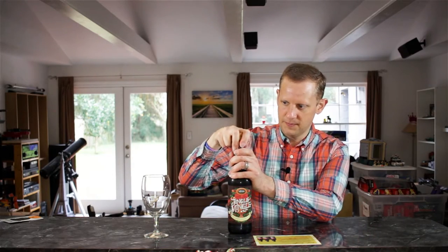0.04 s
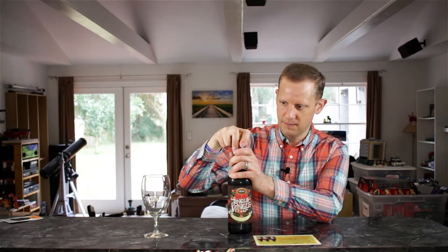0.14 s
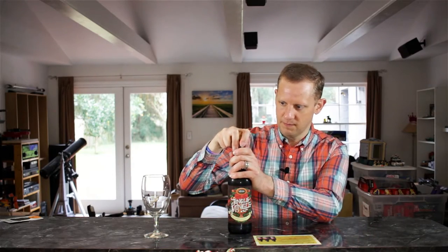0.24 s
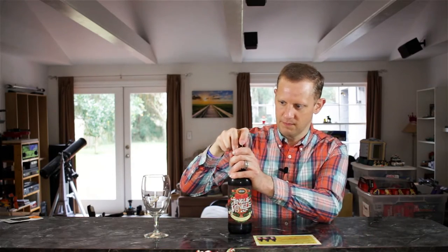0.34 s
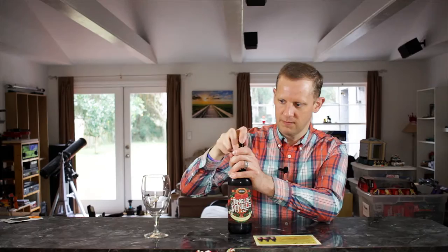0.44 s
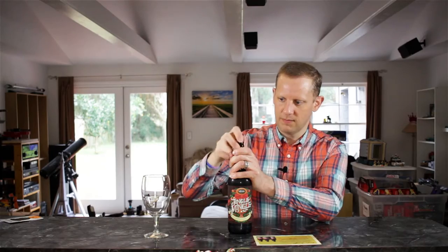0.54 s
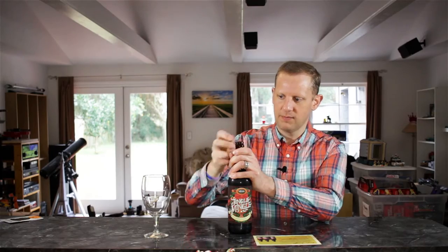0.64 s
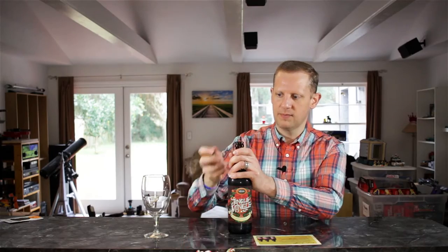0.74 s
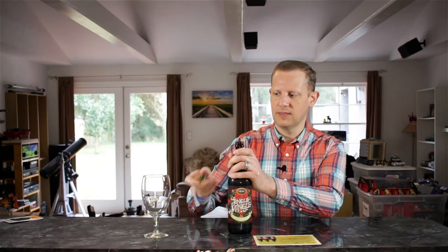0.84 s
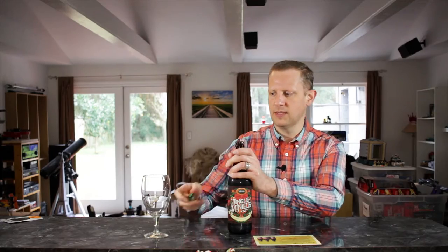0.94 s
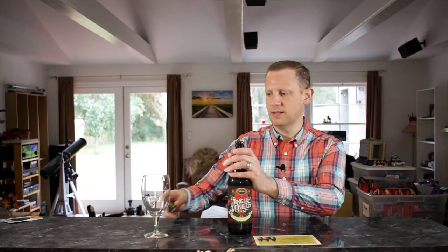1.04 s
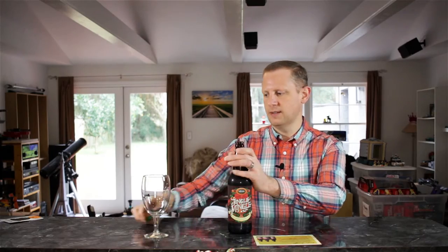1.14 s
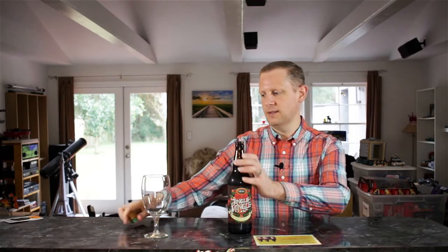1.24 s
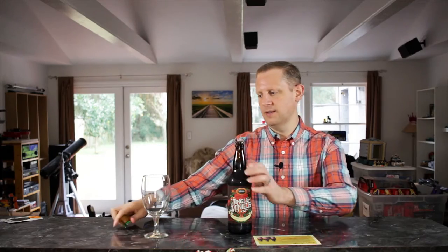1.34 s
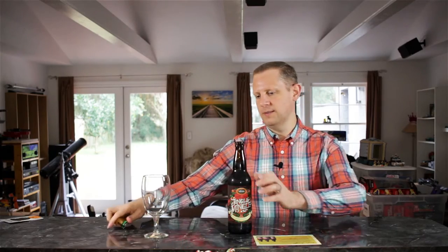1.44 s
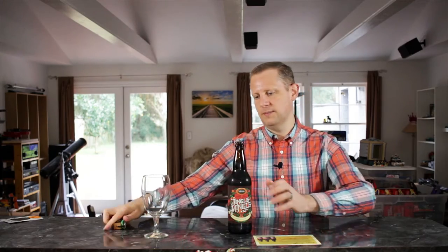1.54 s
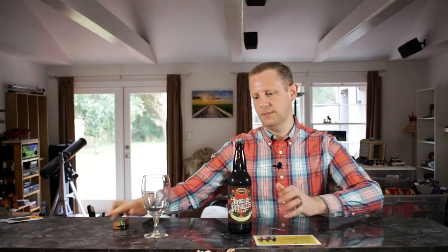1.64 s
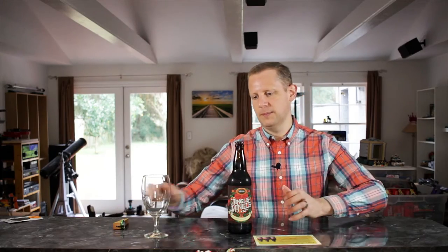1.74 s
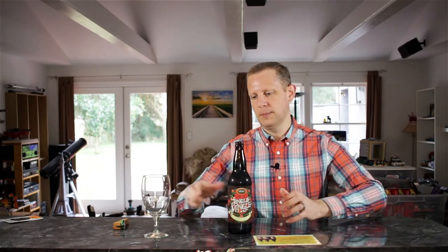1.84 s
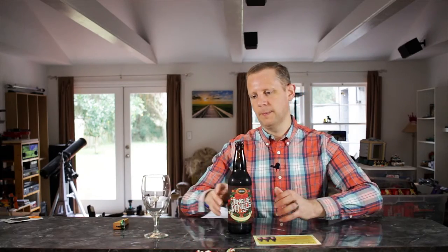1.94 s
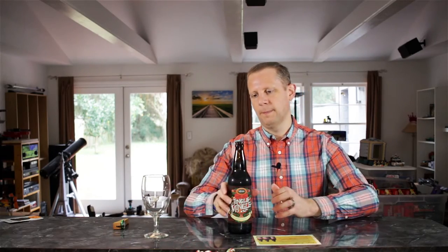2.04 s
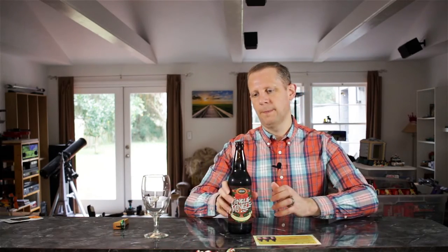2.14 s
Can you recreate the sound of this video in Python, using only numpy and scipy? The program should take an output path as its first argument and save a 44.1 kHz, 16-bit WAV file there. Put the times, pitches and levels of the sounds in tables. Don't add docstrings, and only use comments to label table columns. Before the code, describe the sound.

A crown cap pops off a glass bottle with a short gas hiss, then an opener clacks down

```python
import sys
import numpy as np
from scipy import signal
from scipy.fft import rfft, irfft, next_fast_len
from scipy.io import wavfile
from scipy.ndimage import map_coordinates

SR = 44100
rng = np.random.default_rng(int(sys.argv[2]) if len(sys.argv) > 2 else 0)


def makeup_ratio(level_db):
    decades = np.asarray(level_db, float) / 20
    return 10 ** decades


def store_wav(level_fs):
    pcm = np.round(np.clip(np.atleast_2d(level_fs), -1, 1) * 32767)
    wavfile.write(sys.argv[1], SR, pcm.T.astype(np.int16))


N = 97020

# pitch_hz, level_db (per Hz)
FLOOR_COLOUR = [(18, -73), (30, -25), (415, -6.5), (526, 1.5), (721, -14.5), (889, -17), (962, -13.5),
                (3400, -15), (16000, -22.5)]
FLOOR_DB = -83.5

# pitch_hz, time_s (to fall 60 dB)
ROOM_DECAY = [(150, .35), (1500, 0.25), (6000, 0.26), (15000, 0.25)]
WALL_S, BUILD_S = 0.03, 0.012

# start_s, level_db
ARM_MOVES = [(0.0, -66.5), (0.14, -62.5), (0.4, -61.5), (1.05, -61), (1.41, -58), (1.64, -62), (1.77, -67),
             (2.03, -63), (2.2, -70)]
# pitch_hz, level_db (per Hz)
RUB_COLOUR = [(290, -40), (500, -2.5), (668, -13.5), (761, -4), (6420, -8.5), (14900, -16.5),
              (16000, -24.5)]
# pitch_hz, level_db (per Hz)
RUMBLE_COLOUR = [(15, -84), (25, -56.5), (49, -27), (161, 3), (386, -8), (461, -8.5), (840, -16),
                 (1200, -14.5), (1560, -45.5), (2640, -120)]
# start_s, peak_db, pitch_hz, width (as a share of the pitch)
SHIRT_TICKS = [(0.7279, -36.5, 1500, 2.9), (0.7414, -38, 2310, 2), (0.7805, -51.5, 4500, 0.84),
               (1.008, -41, 5000, 1), (1.117, -33, 2000, 1.5), (1.1334, -32, 2000, .9),
               (1.2397, -33, 3400, .8), (1.3352, -39, 2500, 2.3), (1.821, -44, 4000, 3),
               (1.8716, -42.5, 3500, 1.5), (1.917, -50.5, 5000, 2.3), (1.9779, -33.5, 3500, .25),
               (2.0154, -47, 2880, .5), (2.076, -51.5, 3500, 2), (2.195, -37.5, 2300, 0.71)]
# start_s, level_db, pitch_hz, length_s
CLOTH_THUMPS = [(.298, -44.5, 246, 0.011), (0.338, -51, 197, 0.043), (0.343, -59.5, 1500, 0.11),
                (0.728, -63, 955, 0.051), (0.602, -54, 270, 0.056), (0.729, -55, 223, 0.034),
                (1.127, -56.5, 170, .015), (1.359, -61, 177, 0.019), (1.64, -49.5, 147, 0.066),
                (1.775, -59.5, 94, 0.079), (0.402, -60, 320, 0.092), (1.873, -56.5, 245, 0.01),
                (1.924, -62, 200, 0.024), (2.023, -60.5, 308, 0.018)]
RUB_DB, RUMBLE_DB, LUMP_DB, TICK_DB = -3.5, -4.5, 3, 11
RUMBLE_GROWS = 0.78
GRAIN_DB, GRAINS_PER_S, GRAIN_SPREAD_DB = 20, 70, 3.5

# start_s, peak_db, steel_db (ring over
# knock), brightness_db (per octave)
COUNTER_CLACKS = [
    (1.4384, -24.5, -4.5, 3.5),
    (1.456, -56.5, -11.5, 7),
    (1.56, -17.5, 1, -1.5),
    (1.5899, -22, -6, -1),
    (1.604, -12, 3, -1.5),
    (1.6069, -2.5, -15, -.6),
    (1.621, -14.5, -10, -1),
    (1.6387, -14.5, 0.5, 2),
    (1.645, -21, -22, 0.5),
]
# pitch_hz, width_hz, level_db
KNOCK_TONES = [(458.3, 105, -10), (850, 850, -29), (1163, 160, -6.5), (1706, 360, 4), (2250, 290, -6),
               (2620, 300, -4.5), (3500, 1300, -3.5)]
# pitch_hz, width_hz, level_db
STEEL_TONES = [(5080, 620, -4.5), (5820, 260, 0.5), (6300, 400, -8.5)]
CLACK_DB, CLACK_WET_DB, SCATTER_DB = -11, -8.5, 1.2
CHATTER_DB, CHATTER_S = -15, 0.015
CONTACT_HZ, THIN_HZ, STEEL_FROM_HZ = 4500, 320, 5200
AIR_DB = 6.5
ROOM_TILT_DB = 1.3

# (each pitch_hz, width_hz, level_db)
NECK_TAPS = [
    (0.4769, -27, [(446, 58, -6), (3860, 5900, 10.5)]),
    (.5147, -29.5, [(647, 26, -1), (1050, 180, 1.5), (2494, 81, 1), (3270, 500, -13), (4400, 144, 2), (8100, 530, -7)]),
    (0.63, -19, [(695, 39, -11.5), (2020, 640, -0.5), (2960, 300, 1.5), (4580, 350, 0), (5900, 300, -6), (8770, 1100, 4.5), (12100, 2300, -9)]),
    (0.9395, -29.5, [(1380, 760, 10), (2360, 1150, 14), (3500, 1200, -11)]),
]
TAP_WET_DB = -10
SCRAPE_S, SCRAPE_HALF_S, SCRAPE_DB, SCRAPE_ROUGH_DB = 0.592, 0.026, -54.5, 2.5
SCRAPE_HZ, SCRAPE_RISE = 696, 494

# start_s, level_db
JET_LEVEL = [
    (0.12, -79.5),
    (0.216, -60.5),
    (0.246, -27.5),
    (0.272, -18),
    (0.284, -19.5),
    (0.298, -38.5),
    (0.34, -60.5),
]
# pitch_hz, level_db (per Hz)
JET_COLOUR = [(290, -32), (500, -23), (2810, -21), (3290, -17.5), (3810, -24), (6140, -2), (8960, -6),
              (14900, -1.5), (16000, -2)]
JET_WET_DB = -17

TOP_HZ, BEYOND_DB, LOW_CUT_HZ = 15720, -48, 70
CEILING = 1.05


def unit(x):
    return x / np.sqrt(np.mean(x ** 2) + 1e-20)


def along(points, hz):
    f, v = np.transpose(points)
    return np.interp(np.log(hz + 1), np.log(f + 1), v)


def curve(rows):
    s, v = np.transpose(rows)
    return np.interp(np.arange(N) / SR, s, v, left=-120, right=-120)


def wobble(rate):
    knots = rng.standard_normal(int(N * rate / SR) + 4)
    return map_coordinates(knots, [np.arange(N) * rate / SR])


def filtered(x, response):
    m = 2 * next_fast_len(N // 2 + SR // 4)
    return irfft(rfft(x, m) * response(np.fft.rfftfreq(m, 1 / SR)), m)[:N]


def noise(colour):
    return unit(filtered(rng.standard_normal(N), lambda hz: makeup_ratio(along(colour, hz))))


def blow(s, db):
    away = np.arange(N) - s * SR
    return makeup_ratio(db) * np.sinc(away) * (abs(away) < 24)


def low_cut(f, hz, power):
    return 1 / (1 + (hz / (f + 1)) ** power)


def high_cut(f, hz, power):
    return 1 / (1 + (f / hz) ** power)


def ringing(tones, f):
    power = 0
    for hz, width, db in tones:
        tone = makeup_ratio(db) * 1j * f * SR / np.pi / (hz * hz - f * f + 1j * f * width)
        power = power + abs(tone) ** 2
    return np.sqrt(power)


def causal(gain):
    def response(f):
        c = irfft(np.log(abs(gain(f)) + 1e-6))
        k = np.arange(len(c))
        return np.exp(rfft(c * np.where(k == 0, 1, 2 * (k < len(c) // 2))))
    return response


def snap(hz, wide):
    def response(f):
        once = 1j * f * wide * hz / (hz * hz - f * f + 1j * f * wide * hz)
        return -once ** 2
    return response


def room(x):
    hz, t, z = signal.stft(rng.standard_normal(SR // 2), SR, nperseg=256)
    decay = makeup_ratio(-60 * t / along(ROOM_DECAY, hz)[:, None])
    tail = signal.istft(z * decay, SR, nperseg=256)[1]
    u = np.arange(len(tail)) / SR
    tail = tail * (0.39 + 1 / (1 + np.exp((WALL_S - u) / BUILD_S * 4)))
    return signal.fftconvolve(x, tail / np.linalg.norm(tail))[:N]


def room_floor():
    return makeup_ratio(FLOOR_DB) * noise(FLOOR_COLOUR)


def shirt():
    move_db, t = curve(ARM_MOVES), np.arange(N) / SR
    rub = makeup_ratio(move_db + RUB_DB + 1.5 * wobble(36)) * noise(RUB_COLOUR)

    usual_db = np.median(move_db)
    rumble_db = usual_db + RUMBLE_DB + RUMBLE_GROWS * (move_db - usual_db)
    rumble = makeup_ratio(rumble_db + LUMP_DB * wobble(39.59)) * noise(RUMBLE_COLOUR)

    grain_db = move_db + GRAIN_DB + GRAIN_SPREAD_DB * rng.exponential(size=N).clip(0, 2.5)
    grains = (rng.random(N) < GRAINS_PER_S / SR) * makeup_ratio(grain_db)
    out = rub + rumble + filtered(grains, snap(3500, 2.2))

    for s, db, hz, wide in SHIRT_TICKS:
        out += filtered(blow(s, db + TICK_DB), snap(hz, wide))
    for s, db, hz, length in CLOTH_THUMPS:
        swell = np.exp(-((t - s) / length * 2) ** 2)
        out += makeup_ratio(db) * swell * unit(filtered(rng.standard_normal(N), snap(hz, 1.65)))
    return out


def neck_scrape():
    u = np.arange(N) / SR - SCRAPE_S
    swell = np.exp(-(u / SCRAPE_HALF_S) ** 2)
    hum = np.sin(2 * np.pi * (SCRAPE_HZ + SCRAPE_RISE * u / 2) * u)
    return makeup_ratio(SCRAPE_DB + SCRAPE_ROUGH_DB * wobble(100)) * swell * hum


def neck_taps():
    out = np.zeros(N)
    for s, db, tones in NECK_TAPS:
        top_hz = 2.5 * tones[-1][0]
        glass = lambda f: ringing(tones, f) * low_cut(f, 300, 2) * high_cut(f, top_hz, 2)
        out += filtered(blow(s, db - 18), causal(glass))
    return out + makeup_ratio(TAP_WET_DB) * room(out)


def vary(tones):
    return [(hz, width, db + SCATTER_DB * rng.standard_normal()) for hz, width, db in tones]


def opener():
    out, t = np.zeros(N), np.arange(SR // 40) / SR
    for s, db, steel_db, bright_db in COUNTER_CLACKS:
        knock, steel = vary(KNOCK_TONES), vary(STEEL_TONES)
        scatter = makeup_ratio(CHATTER_DB - 60 * t / CHATTER_S) * rng.standard_normal(len(t)) * (t > 0.0012)
        push = signal.fftconvolve(blow(s, db + CLACK_DB), (t == 0) + scatter)[:N]

        def counter(f):
            tilt = makeup_ratio(bright_db * np.log2(f / 1750 + 0.1))
            return ringing(knock, f) * tilt * high_cut(f, CONTACT_HZ, 4) * low_cut(f, THIN_HZ, 4)

        def blade(f):
            ring = ringing(steel, f) * low_cut(f, STEEL_FROM_HZ, 8) * high_cut(f, 7200, 8)
            crack = makeup_ratio(AIR_DB) * f / (f + 9000)
            return makeup_ratio(steel_db - 2) * (ring + crack)

        def thrown(f):
            return makeup_ratio(ROOM_TILT_DB * np.log2(f / 1750 + 0.25)) * high_cut(f, 9000, 2)

        clack = filtered(push, causal(counter)) + filtered(push, causal(blade))
        out += clack + makeup_ratio(CLACK_WET_DB) * room(filtered(clack, thrown))
    return out


def gas_jet():
    hiss = makeup_ratio(curve(JET_LEVEL)) * noise(JET_COLOUR)
    return hiss + makeup_ratio(JET_WET_DB) * room(hiss)


def scene():
    return (room_floor() + shirt() + neck_scrape() + neck_taps() + opener() + gas_jet())[None]


def roll_off(x):
    return signal.sosfilt(signal.butter(12, 16510, fs=SR, output="sos"), x)


def record(dry):
    def band(f):
        treble = np.where(f < TOP_HZ, 1, makeup_ratio(BEYOND_DB))
        return treble * np.sqrt(low_cut(f, LOW_CUT_HZ, 4))
    held = dry[0] / (1 + abs(dry[0] / CEILING) ** 5) ** (1 / 5)
    return roll_off(filtered(held, band)[None])


dry = scene()
out = record(dry)
store_wav(out)
```